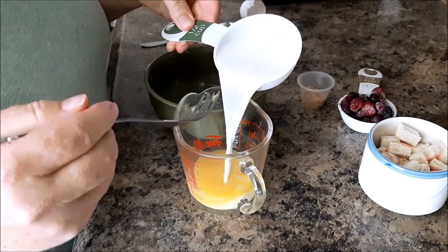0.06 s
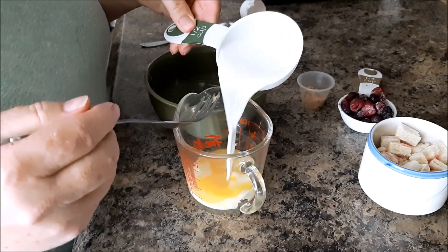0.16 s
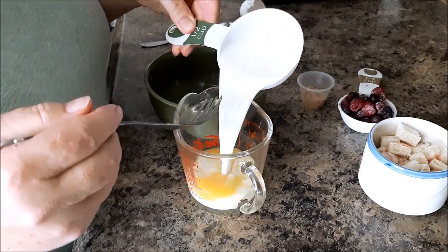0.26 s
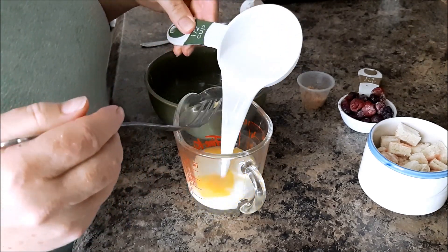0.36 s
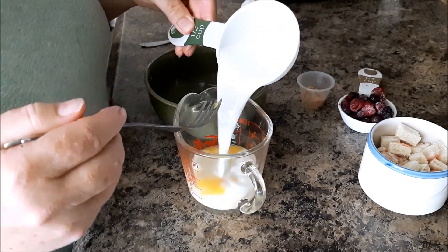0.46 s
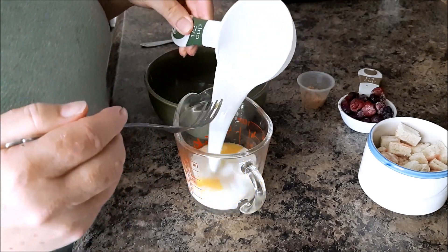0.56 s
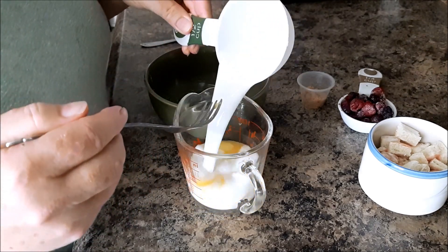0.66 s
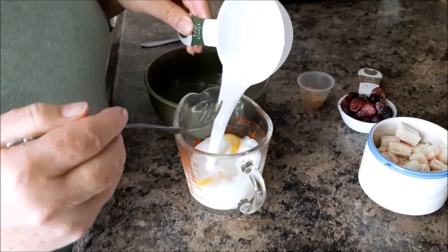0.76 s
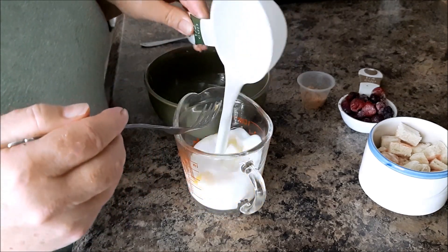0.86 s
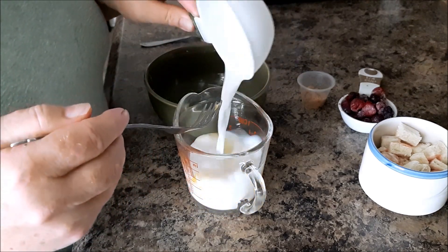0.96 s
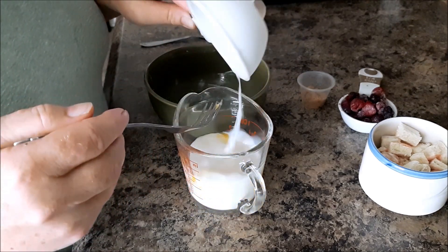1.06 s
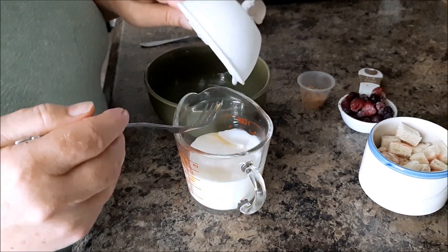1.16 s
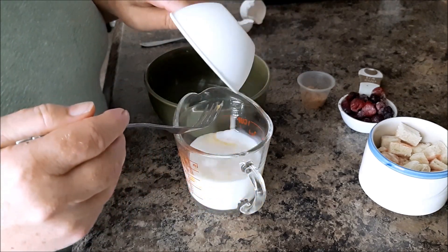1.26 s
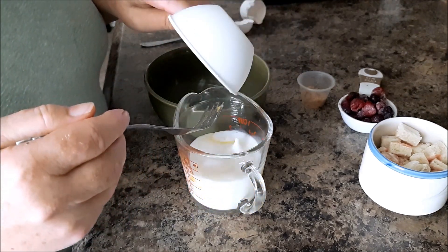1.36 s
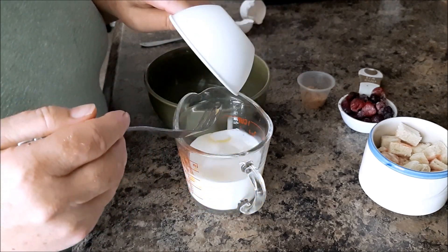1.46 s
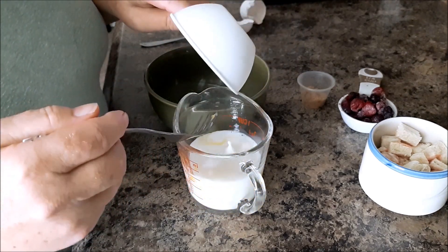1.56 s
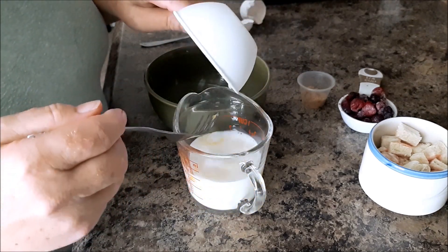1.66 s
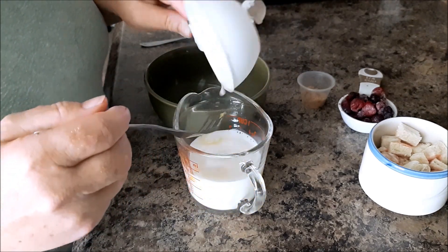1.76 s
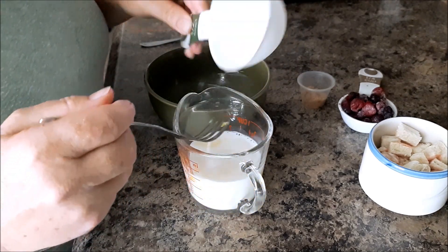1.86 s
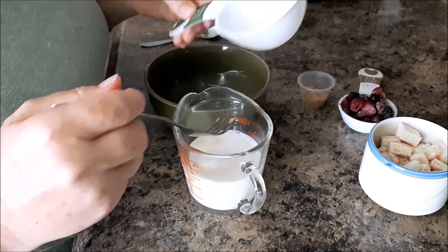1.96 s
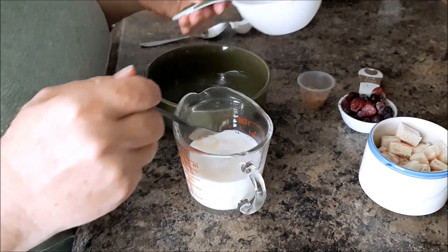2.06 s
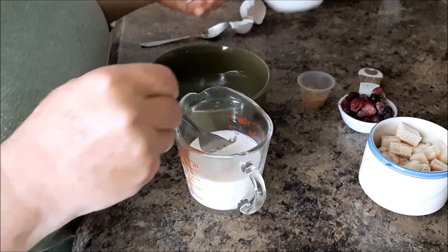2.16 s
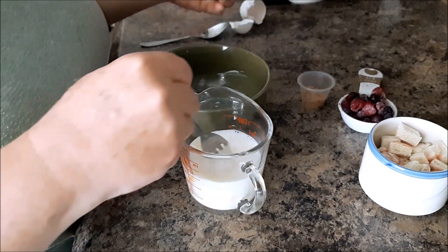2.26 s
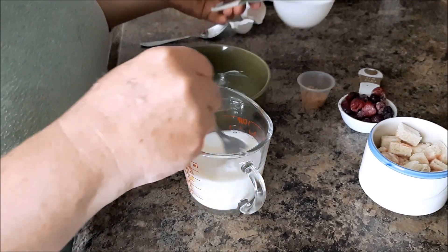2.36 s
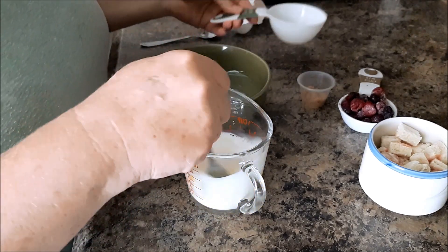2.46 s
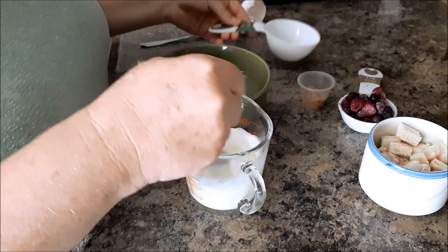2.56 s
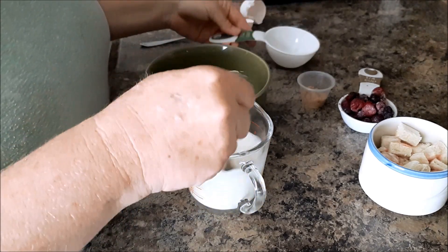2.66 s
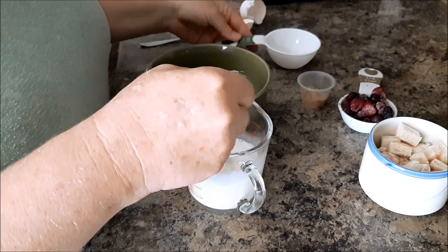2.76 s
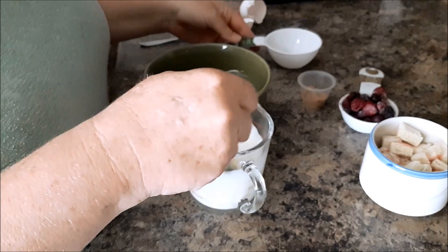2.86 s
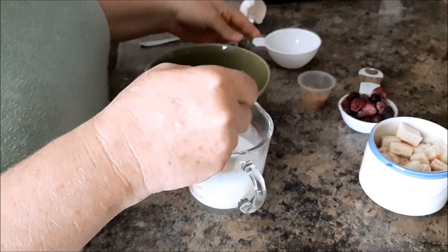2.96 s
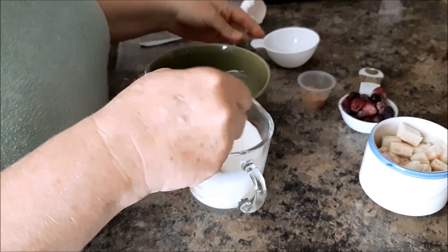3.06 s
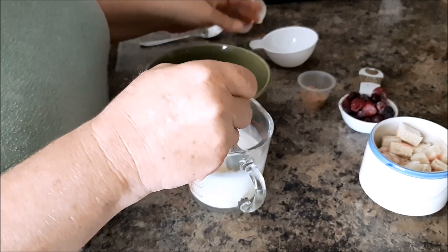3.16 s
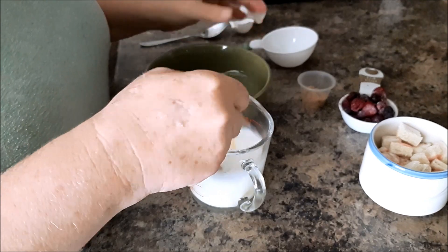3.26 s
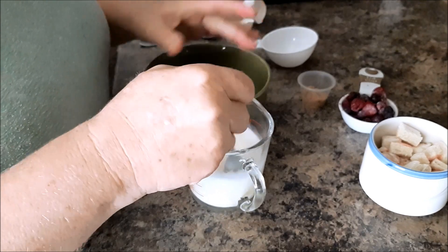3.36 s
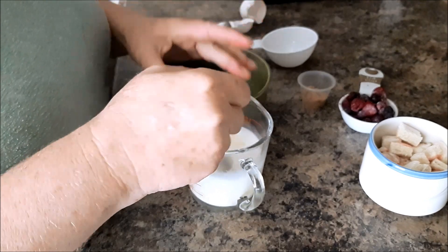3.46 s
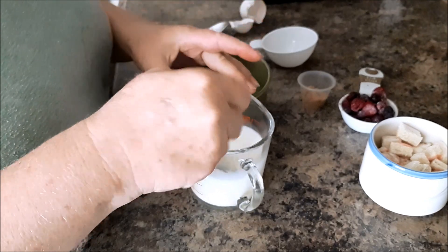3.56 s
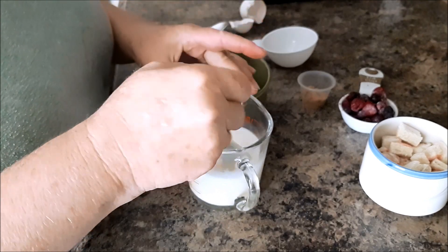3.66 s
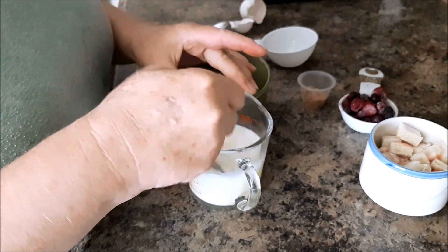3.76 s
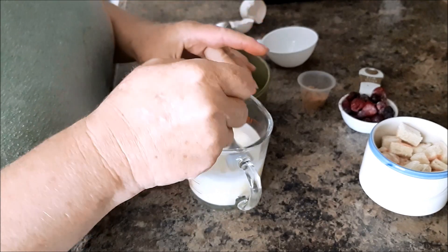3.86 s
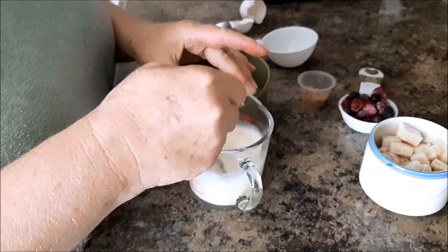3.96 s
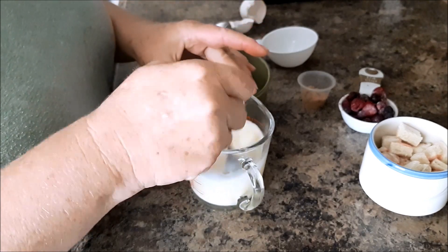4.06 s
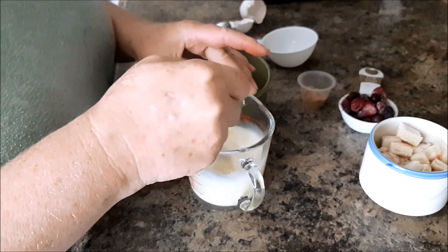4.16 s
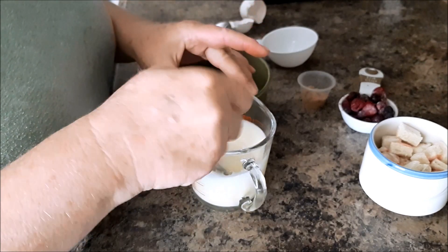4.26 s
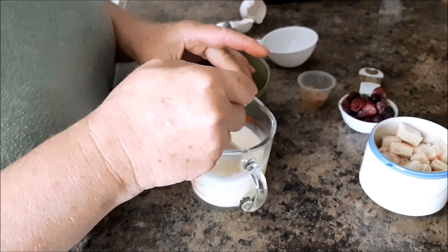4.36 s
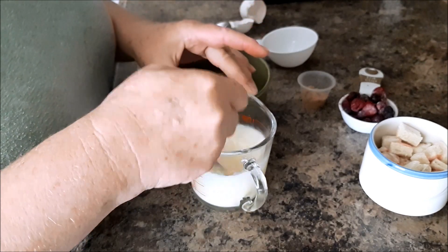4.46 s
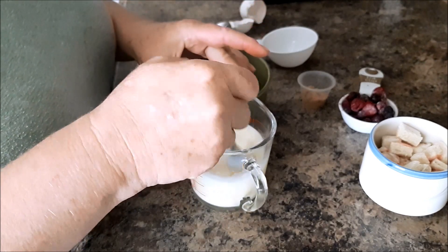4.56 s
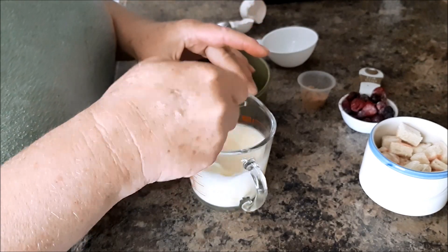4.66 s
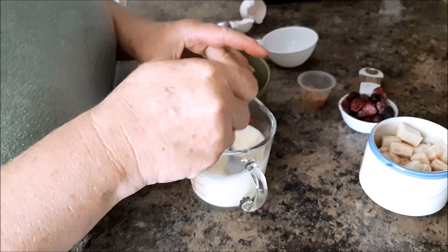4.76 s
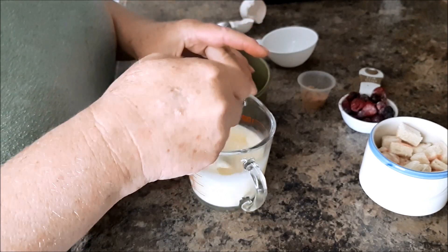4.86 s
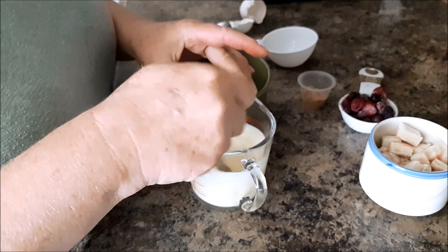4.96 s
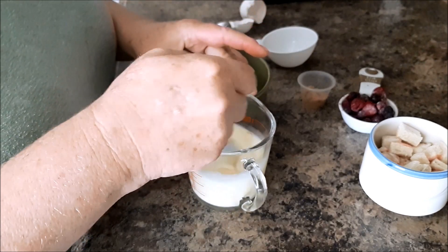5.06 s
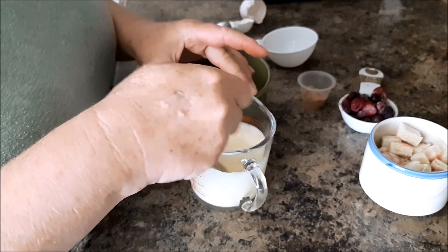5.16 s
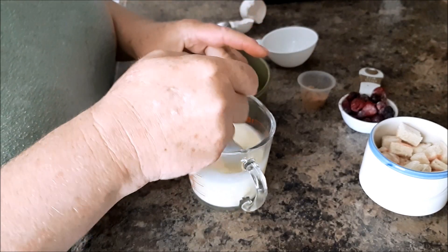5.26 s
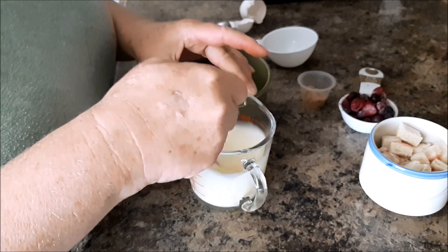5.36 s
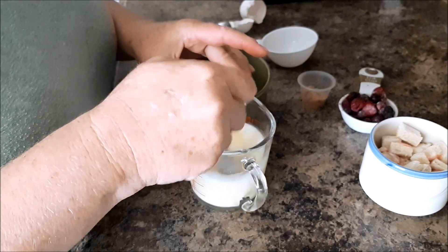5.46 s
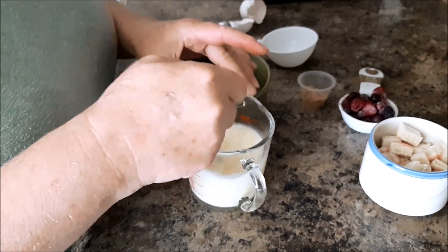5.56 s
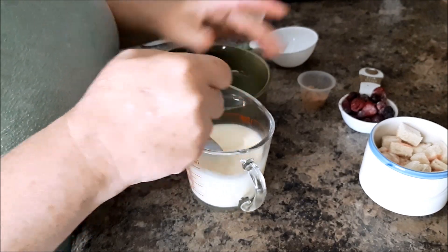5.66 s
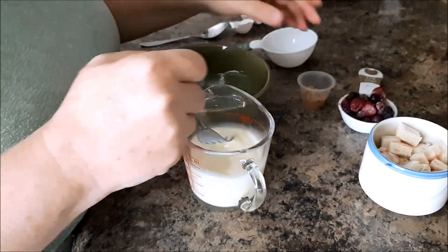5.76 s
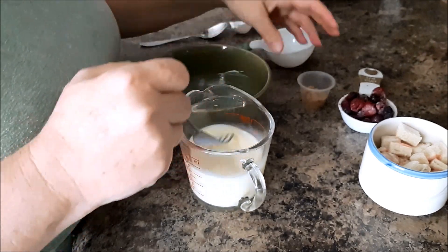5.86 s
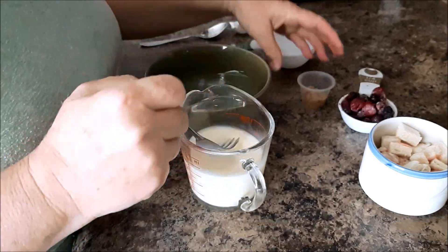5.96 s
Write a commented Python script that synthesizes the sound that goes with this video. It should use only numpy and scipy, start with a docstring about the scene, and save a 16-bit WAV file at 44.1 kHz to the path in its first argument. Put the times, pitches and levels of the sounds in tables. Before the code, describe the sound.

A faint appliance hum and soft hiss run throughout in a small kitchen, heard from close by. Milk is poured almost silently onto an egg in a glass measuring cup, with two soft plops at about 0.2 to 0.3 seconds and fainter drips until 1 second. A light utensil tick follows near 1.2 seconds, then a pause. At about 2.4 seconds a steel fork starts tapping the glass, with a bright clink at 2.5. A plastic scoop clacks loudly onto the counter at 2.6 and settles with a smaller knock near 3.1. The fork beats evenly, about six back-and-forth strokes a second, bright clicks alternating with duller wet clacks and small bubbles. From around 4 seconds it grows more vigorous, with more sloshing and soft low thumps as the cup rocks. The room echoes briefly. The beating stops at about 5.5 seconds, leaving the hum and one tiny tick.

```python
"""In a small kitchen, milk is poured quietly onto an egg in a glass measuring cup: a few soft plops.
The plastic scoop clacks down on the counter just as a fork starts beating the mix.
Going out, the steel tines click on the glass; coming back, they plunge through the liquid and fold in
air that rings as bubbles. The strokes rock the cup. The room answers briefly; an appliance hums."""
import sys
import numpy as np
from scipy import signal
from scipy.fft import rfft, irfft, next_fast_len
from scipy.io import wavfile
from scipy.ndimage import map_coordinates

SR = 44100
rng = np.random.default_rng(int(sys.argv[2]) if len(sys.argv) > 2 else 0)


def file_out(sig):
    """Save sig as 16-bit WAV at sys.argv[1]."""
    # one column per channel
    cols = np.atleast_2d(sig).T
    # limit, then scale
    lim = np.clip(cols, -1, 1)
    pcm = np.round(lim * 32767).astype(np.int16)
    wavfile.write(sys.argv[1], SR, pcm)


N = 264600
T = np.arange(SR // 3) / SR  # seconds within one hit

# Modes of the fork against the cup. Each row: pitch in Hz, dry ring time (t60) in seconds,
# relative level in dB with free tines, the same with tines in the liquid.
FORK_MODES = [(1440, 0.086, -26.5, -10), (1745, 0.11, -28, -2), (2030, 0.11, -19, 4),
              (2693, 0.045, -13, -11), (2994, 0.013, -3, 20.5), (3344, 0.034, -21, 7.5),
              (4016, 0.028, -22, 18), (4445, 0.017, -32, 24.5), (5182, 0.02, 12, 29),
              (5757, 0.018, 0.5, 15), (5946, 0.048, -5.5, -3), (9990, 0.011, -0.5, -21),
              (10910, 0.036, -9, -1), (12300, 0.011, -15, 25), (13600, 0.031, -2.5, 9),
              (13970, 0.013, 2, -2), (14450, 0.013, -14, -16)]
# Steel scratching glass. Each row: frequency in Hz, relative spectral level in dB.
SCRATCH_SPECTRUM = [(300, -11.5), (750, -17), (1300, -9.5), (3000, -6), (5400, 1.5), (6400, -9),
                    (7500, -18), (9000, -12), (10500, -6), (12000, -15), (13900, -9), (16000, -3.5)]


def taps():
    """Going out, the fork taps the wall; harder beating moves more of the glass and rocks the cup."""
    # Taps above the liquid. Each row: start in seconds, strength in dB, lead ring in Hz.
    strokes = [(2.337, -49, 5250), (2.4641, -34, 4970), (2.612, -28, 5310), (2.697, -34.5, 5040),
               (2.8084, -29.5, 5160), (3.0058, -32, 4110), (3.1776, -26.5, 3605), (3.3519, -28, 3620),
               (3.5199, -26, 5234), (3.6957, -27.5, 6090), (3.865, -26, 5104), (4.043, -27, 5225),
               (4.2164, -26.5, 5110), (4.397, -29.5, 5190), (4.5701, -25, 5660), (4.7434, -26.5, 5070),
               (4.9241, -28, 5440), (5.0992, -26, 5150), (5.2752, -25, 5310), (5.448, -27, 5130)]
    out = np.zeros(N)
    for s, db, ring_hz in strokes:
        glass_db = db - 9.5 + 0.7 * effort(s)
        add(out, s, click(dry_hit(ring_hz), glass_db, ring_db=db, sparkle_db=db - 1))
        add(out, s, amp(-39.5 + effort(s)) * thump(swell=0.086))
    return out


def plunges():
    """Coming back, the wet tines clack and fold in air; the slosh grows fastest with effort."""
    # Strokes through the liquid into the wall, each trapping an air pocket. Each row: start in seconds,
    # strength in dB, lead ring in Hz, starting pitch of the pocket in Hz, its level in dB.
    strokes = [(2.902, -35.5, 3900, 1936, -30), (3.0895, -32, 5090, 1690, -57),
               (3.2636, -28.5, 4980, 1783, -25.5), (3.4366, -39, 5240, 1387, -38),
               (3.598, -33.5, 5330, 1580, -48), (3.7707, -35, 5390, 1834, -20.5),
               (3.946, -32, 5000, 1230, -41), (4.1158, -23.5, 4000, 1267, -31),
               (4.2899, -27, 4260, 1378, -30.5), (4.462, -33, 3150, 1395, -27.5),
               (4.638, -26.5, 5180, 1785, -25.5), (4.814, -24.5, 3938, 1930, -30),
               (4.988, -26, 4300, 2084, -23.5), (5.1685, -26, 5480, 1500, -30),
               (5.346, -23.5, 4000, 1460, -31), (5.5163, -23, 5310, 1910, -33.5)]
    out = np.zeros(N)
    for s, db, ring_hz, pocket_hz, pocket_db in strokes:
        push_db = effort(s)
        glass_db, sparkle_db = -40 + 0.7 * push_db, -28 + 0.73 * push_db
        add(out, s, click(wet_hit(ring_hz), glass_db, db, sparkle_db))
        add(out, s + 0.00815, amp(-33.5 + 1.07 * push_db) * thump(swell=0.056))
        add(out, s, amp(-30.5 + 3.3 * push_db) * (slosh() + spatter()))
        add(out, s, amp(db) * froth())
        pocket = bubble(pocket_hz, t60=0.033, rise=0.031, onset=0.0046)
        add(out, s + 0.001824, amp(pocket_db) * pocket)  # it closes just after the contact
    return out


def clinks():
    """When the fork rebounds cleanly, the cup stays still and its rim keeps singing."""
    # Bounces off the rim. Each row: start in seconds, strength in dB, lead ring in Hz.
    rebounds = [(2.5019, -23, 5100), (3.9119, -27.5, 6200)]
    rim = np.sin(2 * np.pi * 2012 * T) * fade(0.11)
    out = np.zeros(N)
    for s, db, ring_hz in rebounds:
        add(out, s, click(dry_hit(ring_hz), glass_db=db - 14.5, ring_db=db, sparkle_db=db - 9.5))
        add(out, s, amp(db) * rim)
    return out


def effort(s):
    """How hard the hand is beating at time s, in dB."""
    # The beating builds up and eases off at the end. Each row: time in seconds, effort in dB.
    vigour = [(2.4, -2), (3.0, -5), (3.6, -5), (4.25, 0.5), (4.8, 0), (5.25, 1.5), (5.52, -2)]
    return np.interp(s, *np.transpose(vigour))


def dry_hit(ring_hz):
    """Free tines ring brightly against the glass and scratch along it."""
    hz, t60, db, _ = np.transpose(FORK_MODES)
    steel = blow(ringing(hz, db, t60, detune=0.0052, vary_db=4.5))
    lead = blow(np.sin(2 * np.pi * ring_hz * T) * fade(0.02))
    scratch = blow(noise(SCRATCH_SPECTRUM) * fade(0.049) * attack(0.0019))
    hit = blow(chatter(steel, spread=0.0075, fall_db=4)) + amp(-1) * lead + amp(-5) * scratch
    return hit * attack(0.022)  # the tines meet the glass at a glancing angle


def wet_hit(ring_hz):
    """Tines in the liquid clack more dully."""
    hz, t60, _, db = np.transpose(FORK_MODES)
    steel = blow(ringing(hz, db, t60 * 0.68, detune=0.044, vary_db=3.5))  # the liquid damps the steel
    lead = blow(np.sin(2 * np.pi * ring_hz * T) * fade(0.021))
    scratch = blow(noise(SCRATCH_SPECTRUM) * fade(0.061))
    hit = blow(chatter(steel, spread=0.0028, fall_db=0.5)) + amp(-0.5) * lead + amp(-3) * scratch
    return hit * attack(0.0031)  # a film of milk cushions the contact


def chatter(x, spread, fall_db, count=5):
    """The tines land one after another within `spread` seconds, each more softly."""
    out = x.copy()
    for k in range(1, count):
        delay = spread * (k + rng.uniform(-.5, .5)) / count
        add(out, delay, x * amp(-fall_db * k) * rng.choice([-1, 1]))
    return out


def click(x, glass_db, ring_db, sparkle_db):
    """The point of contact sets how the low, middle and high modes share the blow."""
    glass = amp(glass_db) * blow(band(x, 2800, "low"))
    ring = amp(ring_db) * blow(band(x, [2800, 7500], "band"))
    sparkle = amp(sparkle_db) * blow(band(x, 7500, "high"))
    return glass + ring + sparkle


def thump(swell):
    """The push of the fork rocks the cup on the counter."""
    # Low rocking modes. Each row: pitch in Hz, relative level in dB, ring time (t60) in seconds.
    rocking_modes = [(99, -4, 0.23), (149, 2.5, 0.096), (190.6, 2, 0.11), (241, -10, 0.077),
                     (322.5, -6.5, 0.12), (361.7, -7.5, 0.12), (537, -5, 0.048)]
    hz, db, t60 = np.transpose(rocking_modes)
    return blow(ringing(hz, db, t60, detune=0.055, vary_db=1) * attack(swell))


def slosh(count=8):
    """The mix slops against the wall: a run of bubbles, the larger tending to come later, and a gulp."""
    out = np.zeros(len(T))
    for when, size, soft in rng.random((count, 3)):
        hz = 2500 * 2 ** (-.5 * when - 0.993 * size)
        add(out, 0.00372 + 0.026 * when, amp(-2.7 * soft) * bubble(hz, t60=0.016, rise=0.15))
    gulp_hz = 1104 * (1 + 0.077 * rng.standard_normal())  # the hollow behind the fork closes
    add(out, 0.02, bubble(gulp_hz, t60=0.032, rise=0.026, onset=0.034))
    swell_hz = 370.7 * (1 + 0.04 * rng.standard_normal())  # the body of the liquid heaves
    add(out, 0.02, amp(-5.5) * bubble(swell_hz, t60=0.073, rise=0.029, onset=0.028))
    return out


def spatter(count=24):
    """Flung drops land on the wall with short, dull ticks."""
    out = np.zeros(len(T))
    for when, pitch, soft in rng.random((count, 3)):
        tick = bubble(850 * 2 ** (1.94 * pitch), t60=0.0063, rise=0.14, onset=0.0012)
        add(out, 0.008 + 0.035 * when, amp(-1 - 18 * soft - 13 * when) * tick)
    return out


def froth(count=40):
    """Tiny bubbles crackle after the splash and thin out."""
    out = np.zeros(len(T))
    for when, pitch, soft in rng.random((count, 3)):
        pop = bubble(2400 * 2 ** (1.444 * pitch), t60=0.0034, rise=0.018, onset=0.0007)
        add(out, 0.0091 + .042 * when, amp(0.5 - 32 * soft - 9.5 * when) * pop)
    return out


def bubble(hz, t60, rise, onset=0.0081):
    """A pocket of air rings, its pitch climbing by the share `rise` as it nears the surface."""
    pitch = hz * (1 + rise * attack(t60))
    return np.sin(2 * np.pi * np.cumsum(pitch) / SR) * fade(t60) * attack(onset)


def scoop():
    """The plastic shell clacks on the counter and buzzes briefly as it settles."""
    # Landing and settling. Each row: start in seconds, then shell, counter and edge levels in dB.
    knocks = [(2.6226, -9, -22.5, -10), (2.6592, -14.5, -28, -20.5), (2.734, -43, -49, -25.5),
              (3.1103, -36, -46, -19), (3.122, -30.5, -30.5, -27)]
    # Modes of the shell. Each row: pitch in Hz, bandwidth in Hz, relative level in dB.
    shell_modes = [(646, 49, -6.5), (780, 28, 2.5), (1307, 390, 10.5), (1740, 88, 16), (1915, 76, -2),
                   (2040, 79.5, -15.5), (2287, 32, -15)]
    # The counter's thud and the edge's tick. Each row: frequency in Hz, relative spectral level in dB.
    thud_spectrum = [(40, -46), (70, -23.5), (110, 4), (160, 5.5), (240, -4), (340, -5), (480, -4),
                     (700, -7), (1000, -7), (1500, -27.5), (2500, -57.5)]
    edge_spectrum = [(1500, -35.5), (3000, 5), (4800, 6), (6500, -6), (8000, -6), (12000, -12),
                     (16000, -26)]
    buzz_spectrum = [(500, -16.5), (1000, -9), (2000, 1), (2450, -7), (3000, -33.5), (5000, -27.5)]
    hz, width, db = np.transpose(shell_modes)
    t60 = np.log(1000) / np.pi / width
    clack = blow(np.sin(2 * np.pi * 2000 * T) * fade(0.003) * attack(0.001))
    out = np.zeros(N)
    for s, shell_db, counter_db, edge_db in knocks:
        shell = blow(ringing(hz, db, t60, detune=0.011, vary_db=2))
        buzz = blow(noise(buzz_spectrum) * fade(0.16))
        plastic = amp(-4.5) * clack + amp(-14.5) * shell + amp(-7.5) * buzz
        add(out, s, amp(shell_db) * band(plastic, 177, "high"))  # the shell's clack and buzz carry no bass
        thud = noise(thud_spectrum) * fade(0.12) * attack(0.0096)
        add(out, s, amp(counter_db) * blow(band(thud, 66, "high")))
        edge = noise(edge_spectrum) * fade(0.013) * attack(0.0026)
        add(out, s, amp(edge_db - 13) * blow(edge))
    return out


def pouring():
    """The milk slides in almost silently: a few soft plops and splats, then light utensil ticks."""
    # Milk drips. Each row: start in seconds, starting pitch in Hz, level in dB, t60 in seconds.
    drips = [(.213, 1040, -41, .04), (.282, 1020, -24, .022), (.617, 1100, -52, .025),
             (.955, 1360, -54, .06)]
    # Soft splats of the first milk drips, then light utensil ticks.
    # Each row: start in seconds, then relative body and treble levels in dB.
    splats_and_ticks = [(0.219, -61, -53), (0.283, -47, -75), (0.899, -62, -60), (1.137, -46.5, -52),
                        (1.158, -35, -46.5), (5.959, -60, -51.5)]
    # The body of a splat or tick. Each row: frequency in Hz, relative spectral level in dB.
    body_spectrum = [(600, -54), (1050, 9.5), (1300, -15), (1580, 12.5), (2200, -8), (3250, 4), (4200, 1.5),
                     (5400, -8.5), (7000, -35)]
    treble_spectrum = [(3000, -25), (6000, -5), (16000, -3)]
    out = np.zeros(N)
    for s, hz, db, t60 in drips:
        add(out, s, amp(db) * bubble(hz, t60, rise=.07, onset=t60))
    for s, body_db, treble_db in splats_and_ticks:
        add(out, s, amp(body_db - 4.5) * blow(noise(body_spectrum) * fade(0.064)))
        add(out, s, amp(treble_db - 8) * blow(noise(treble_spectrum) * fade(0.072)))
    return out


def kitchen(x, near_db, room_db, left_db, pieces=20):
    """Direct sound, near reflections off counter and hands, then the room; all shift as the arm moves."""
    out = np.zeros((2, N))
    lead, wall_delay = 64, 220  # samples
    for k, piece in enumerate(np.split(x, pieces)):  # each piece gets a new random response
        answer = amp(room_db) * np.pad(room_tail(alike=0.77), ((0, 0), (wall_delay, 0)))
        near = rng.standard_normal((2, len(T))) * fade(0.021) * attack(0.0097)
        near = band(near, 420, "high")  # small surfaces reflect no bass
        answer[:, :len(T)] += amp(near_db) * near / np.linalg.norm(near[0])
        answer[:, 0] += 1  # direct sound
        answer = filtered(np.pad(answer, ((0, 0), (lead, 0))), radiation(spread=0.58))
        for side in range(2):
            add(out[side], k / pieces * N / SR, signal.fftconvolve(piece, answer[side])[lead:])
    return out * amp([[left_db / 2], [-left_db / 2]])


def radiation(spread, size=24):
    """Each resonance of the cup reaches the two microphones with its own phase."""
    phases = spread * rng.standard_normal(size)
    grid_hz = np.linspace(0, SR / 2, size)
    return lambda hz: np.exp(1j * np.outer([1, -1], np.interp(hz, grid_hz, phases)))


def room_tail(alike):
    """A stereo tail in which each frequency dies at its own speed."""
    # The kitchen's reverb. Each row: frequency in Hz, decay time (t60) in seconds.
    decay_times = [(100, 0.18), (300, 0.89), (800, 0.49), (2000, 0.4), (5000, 0.38), (13000, 0.34)]
    hz, t, spectra = signal.stft(rng.standard_normal((2, SR // 2)), SR, nperseg=256)
    decay = np.exp(-np.log(1000) * t / along(decay_times, hz)[:, None])
    mid, side = signal.istft(spectra * decay, SR, nperseg=256)[1]
    tail = np.array([mid + (1 - alike) * side, mid - (1 - alike) * side])
    return tail / np.linalg.norm(tail[0])


def background():
    """An appliance hums, slightly unsteady, over a faint rumble and hiss."""
    # Tones of the appliance. Each row: pitch in Hz, level in dB.
    hum_tones = [(116, -83.5), (154, -61), (243, -76), (309, -80), (329, -78)]
    # Low and high room tone. Each row: frequency in Hz, relative spectral level in dB.
    rumble = [(25, -24.5), (60, -4), (110, -0.5), (155, 5.5), (200, -0.5), (330, -7.5), (500, -6.5),
              (900, -25), (2000, -56.5)]
    hiss = [(400, -36), (700, -11), (1200, -11), (1700, -13), (2200, -8.5), (2900, -3), (3500, -12),
            (4000, -4), (5100, -7), (5900, -17.5), (6700, -23), (15500, -18.5)]
    t = np.arange(N) / SR
    drift = lambda rate: map_coordinates(rng.standard_normal(int(N * rate / SR) + 4), [t * rate])
    hum = np.zeros(N)
    for hz, db in hum_tones:
        level = amp(db + 1.6 * drift(7.8)) * np.sqrt(2)
        hum += level * np.sin(2 * np.pi * hz * t + 0.33 * drift(4.4))
    stereo = lambda spectrum: noise(spectrum, N) + np.array([noise(spectrum, N), noise(spectrum, N)])
    return hum + amp(-69) * stereo(rumble) + amp(-70.5) * stereo(hiss)


def ringing(hz, db, t60, detune, vary_db):
    """Damped modes, struck at slightly new pitches and strengths."""
    hz = hz * (1 + detune * rng.standard_normal(len(hz)))
    gain = amp(db + vary_db * rng.standard_normal(len(hz))) * rng.choice([-1, 1], len(hz))
    return gain @ (np.sin(2 * np.pi * hz[:, None] * T) * fade(t60[:, None]))


def noise(spectrum, size=len(T)):
    """Noise of rms 1, coloured by (Hz, dB) points."""
    x = filtered(rng.standard_normal(size), lambda hz: amp(along(spectrum, hz)))
    return x / np.sqrt(np.mean(x ** 2) + 1e-20)


def amp(db):
    """Decibels to gain."""
    return 10 ** (np.asarray(db) / 20)


def blow(x):
    """Scale a hit to the energy of 5 ms at rms 1."""
    return x / np.sqrt(np.sum(x ** 2) / (.005 * SR) + 1e-20)


def fade(t60):
    """A decay that loses 60 dB in t60 seconds."""
    return np.exp(-np.log(1000) * T / t60)


def attack(seconds):
    """A rise from 0 that levels off at 1."""
    return 1 - fade(seconds)


def along(points, hz):
    """Interpolate (Hz, value) points on a log frequency axis."""
    f, v = np.transpose(points)
    return np.interp(np.log(hz + 1), np.log(f + 1), v)


def filtered(x, response):
    """Shape the spectrum of x with a function of frequency."""
    n = x.shape[-1]
    m = next_fast_len(n + 8192)
    return irfft(rfft(x, m) * response(np.fft.rfftfreq(m, 1 / SR)), m)[..., :n]


def band(x, edges, kind):
    """A causal low-, high- or band-pass, with edges in Hz."""
    return signal.sosfilt(signal.butter(4, edges, kind, fs=SR, output="sos"), x)


def add(track, s, x):
    """Mix x into the track at time s."""
    start = max(round(s * SR), 0)
    part = track[start:start + len(x)]
    part += x[:len(part)]


def scene():
    """Fork, scoop and milk share one counter in front of the microphones."""
    fork = kitchen(taps() + plunges() + clinks(), near_db=-5, room_db=-6.5, left_db=-4)
    knocks = kitchen(scoop(), near_db=-6, room_db=-7, left_db=-5)
    milk = kitchen(pouring(), near_db=-7, room_db=-10, left_db=1.5)
    return fork + knocks + milk + background()


def record(dry):
    """Two close microphones hear nearly the same bass; the treble leans left and the very top is cut."""
    # Stereo balance. Each row: frequency in Hz, left minus right in dB.
    lean = [(100, -0.2), (400, 3.2), (1300, 4), (2400, 8.7), (4400, 5.3), (8000, 0.5), (15000, 3.5)]
    width_db = [(100, -10), (200, -0.5), (400, -0.5), (800, 3), (3000, 3)]
    top_hz = 15850
    mid, side = (dry[0] + dry[1]) / 2, (dry[0] - dry[1]) / 2
    side = filtered(side, lambda hz: amp(along(width_db, hz)))
    pair = np.array([mid + side, mid - side])
    pair = filtered(pair, lambda hz: amp(np.outer([.5, -.5], along(lean, hz))))
    return filtered(pair, lambda hz: 1 / (1 + (hz / top_hz) ** 120))


dry = scene()
out = record(dry)
file_out(out)
```